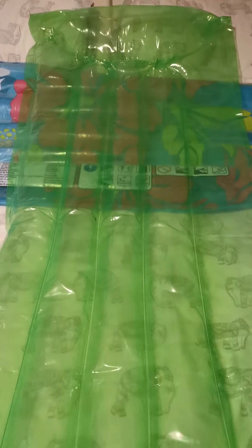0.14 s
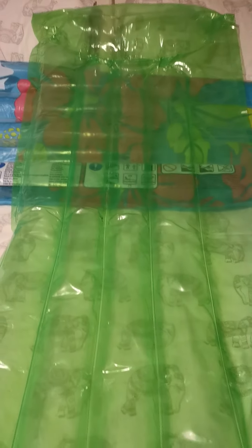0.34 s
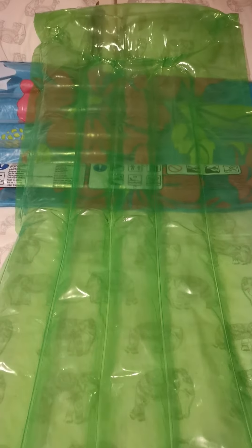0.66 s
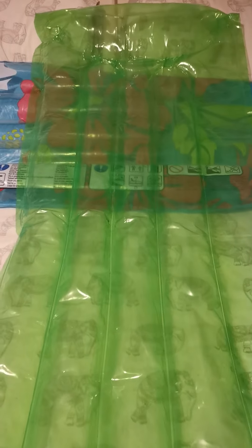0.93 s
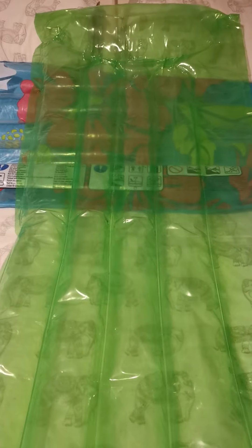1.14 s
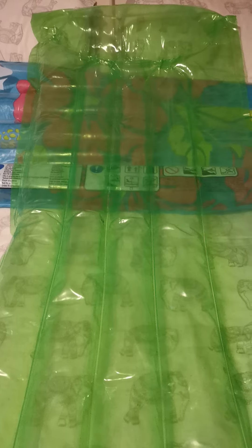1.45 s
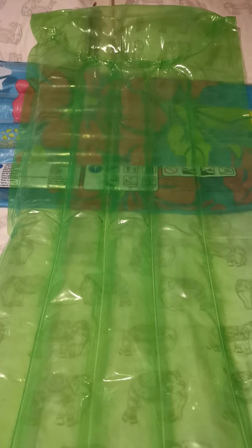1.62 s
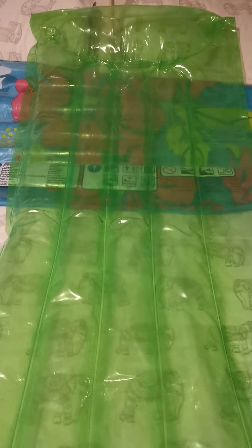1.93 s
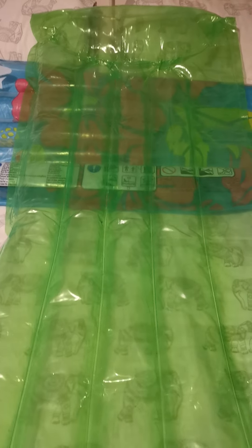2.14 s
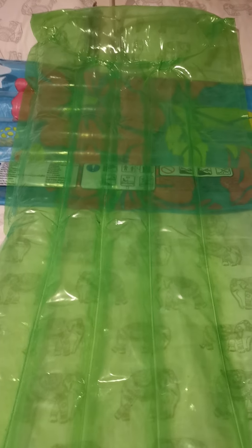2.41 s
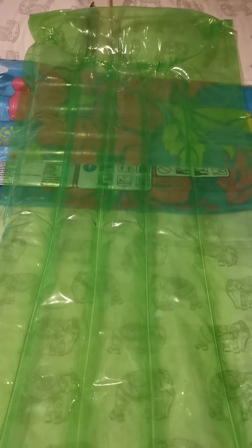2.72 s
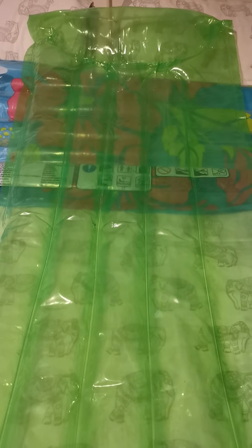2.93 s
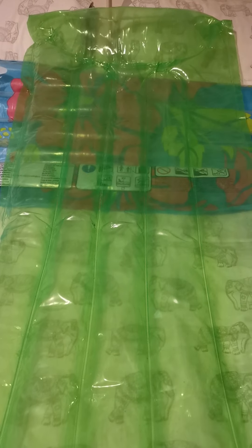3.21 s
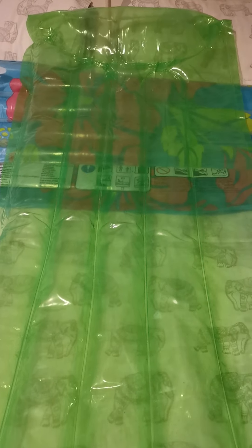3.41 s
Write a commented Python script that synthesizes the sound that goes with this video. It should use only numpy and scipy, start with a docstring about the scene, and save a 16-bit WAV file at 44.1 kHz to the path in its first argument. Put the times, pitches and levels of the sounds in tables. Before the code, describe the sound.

High, steady electric pump whine with rushing, sputtering air and faint plastic crinkling.

```python
"""A high, steady whine over rushing air: a small electric pump empties a plastic air bed, close by.
The ten-blade impeller makes the whine, the unbalanced shaft hums below it, and air flutters and
sputters through the valve. Room reflections make the blade tones swell and fade at each ear.
About two seconds in, the motor speeds up slightly and the plastic hisses and rustles for half a second."""
import sys
import numpy as np
from scipy import signal
from scipy.fft import rfft, irfft
from scipy.io import wavfile

SR = 44100
rng = np.random.default_rng(int(sys.argv[2]) if len(sys.argv) > 2 else 0)


def dump_mix(stems):
    """Bounce the given channels to the path in sys.argv[1] as a 16-bit WAV at rate SR."""
    frames = np.atleast_2d(stems).T  # one column per channel
    limited = np.clip(frames, -1, 1)  # hard clip at full scale
    pcm = np.round(limited * 32767).astype(np.int16)
    wavfile.write(sys.argv[1], SR, pcm)


N = 157437
T, HZ = np.arange(N) / SR, np.fft.rfftfreq(N, 1 / SR)
BLADES, MAINS_HZ = 10, 100


# Rides for the three blade tones, before their trims: time_s, left_db, right_db, left_lead_rad
LOW_WHINE = [(0.01, -37.2, -27.5, 0.1), (0.1, -37, -25.5, 1.5), (0.33, -42.7, -25, -4),
             (0.64, -35, -23.5, -4.5), (0.93, -36, -25.5, -5), (1.12, -35.5, -34.5, -6.5),
             (1.31, -43.4, -29.5, -7.9), (1.58, -39, -41, -8.5), (1.61, -42, -32, -3.5),
             (1.81, -32.5, -37.5, -4), (2.04, -37.5, -24, -6), (2.23, -43.9, -26, -6), (2.48, -33, -27, -5),
             (2.58, -36, -42, -4.5), (2.63, -48.5, -36, -7), (2.93, -52, -33, -9), (3.02, -59, -34, -2),
             (3.56, -44, -28, -2)]
MAIN_WHINE = [(0.01, -39.5, -27.0, -3.0), (0.06, -36.5, -29.3, -3.6), (0.14, -35.8, -24.0, -4.3),
              (0.22, -36.6, -21.3, -3.7), (0.41, -44.1, -23.9, -2.1), (0.56, -45.1, -27.1, -1.5),
              (0.73, -40.4, -23.4, -2.9), (0.93, -35.5, -23.5, -2.9), (1.1, -36.0, -30.9, -4.7),
              (1.2, -44.9, -25.5, -6.7), (1.25, -51.3, -24.7, -8.5), (1.39, -41.2, -25.6, -8.3),
              (1.54, -48.2, -24.5, -7.8), (1.68, -35.2, -29.6, -5.5), (1.9, -37.4, -27.6, -3.4),
              (2.1, -44.9, -30.8, -3.5), (2.2, -35.1, -29.8, -4.1), (2.31, -33.4, -26.9, -4.8),
              (2.41, -40.9, -31.1, -5.2), (2.48, -48.2, -39.6, -6.9), (2.55, -42.6, -29.8, -7.8),
              (2.62, -44.7, -33.5, -8.8), (2.72, -40.9, -27.1, -11.4), (2.85, -36.1, -26.9, -11.0),
              (3.2, -37.3, -24.7, -12.6), (3.45, -38.7, -25.0, -11.8), (3.53, -52.7, -26.9, -11.5)]
TOP_WHINE = [(0.01, -58, -66, 0), (0.42, -54, -49, -2), (0.77, -60, -50, 3.2), (1.081, -56.3, -53.0, -1.5),
             (1.181, -57.6, -63, -1.5), (1.47, -55, -48.5, -2.1), (2.18, -44, -56, 0.5),
             (2.37, -57, -55.9, -0.5), (2.85, -52, -49, -3.5), (3.01, -47, -54, -0.8),
             (3.29, -46, -46.5, 0.9), (3.56, -59.9, -57, 2)]

def impeller(shaft):
    """Passing blades chop the air into three harmonics, the second the strongest and purest."""
    return (blade_tone(shaft, LOW_WHINE, harmonic=1, trim_db=-1, rough=0.12, rate_hz=88)
            + blade_tone(shaft, MAIN_WHINE, harmonic=2, trim_db=5, rough=0.032, rate_hz=47)
            + blade_tone(shaft, TOP_WHINE, harmonic=3, trim_db=0.5, rough=0.3, rate_hz=14))


def blade_tone(shaft, ride, harmonic, trim_db, rough, rate_hz):
    """One harmonic of the passing blades; reflections shift its level and phase at each ear."""
    phase = harmonic * BLADES * shaft + rng.uniform(0, 2 * np.pi)
    left = amp(curve(ride)) * tone(phase + curve(ride, column=3), rough, rate_hz)
    right = amp(curve(ride, column=2)) * tone(phase, rough, rate_hz)
    return amp(trim_db) * np.array([left, right])


# Tuning of the main whine, two cycles per passing blade: time_s, pitch_hz
WHINE_PITCH = [(0, 6985), (.5, 6983), (.78, 6977), (1.1, 6976), (1.4, 6972), (1.62, 6967), (1.9, 6968),
               (2.05, 6984), (2.32, 6994), (2.62, 6990), (2.9, 6982), (3.2, 6975), (3.57, 6977)]

def shaft_angle(ripple_hz=0.36, jitter_hz=0.067):
    """The shaft's turning in radians; its speed drifts, jitters and ripples with the mains."""
    ripple = ripple_hz * np.sin(2 * np.pi * MAINS_HZ * T)
    speed_hz = curve(WHINE_PITCH) / (2 * BLADES) + ripple + jitter_hz * wander(30)
    return 2 * np.pi * np.cumsum(speed_hz) / SR


# Colour of the rushing air: freq_hz, left_db_per_hz, right_db_per_hz
AIR_COLOUR = [(30, -100, -95), (65, -90, -98), (100, -83, -82.5), (131, -83.5, -86), (180, -81.5, -77.5),
              (214, -81, -82.5), (330, -72.5, -78.5), (405, -74.5, -87), (424, -72.5, -69), (570, -79, -77),
              (617, -72.5, -73), (620, -81, -82.5), (820, -79.5, -76), (890, -73.5, -71),
              (1320, -75.5, -75.5), (1580, -76, -76.5), (1990, -73.5, -71), (2590, -74.5, -62),
              (2900, -91, -68.5), (3410, -69, -61), (4080, -77.5, -63.5), (5030, -64.5, -63),
              (5460, -68, -63), (5620, -69.5, -62.5), (6560, -68, -67), (7150, -76, -60.5),
              (7780, -65, -63.5), (8110, -71, -76), (9260, -78.5, -82), (9740, -86.5, -92),
              (15000, -91, -93.5)]
# Swell of the air, of which each band takes a small share: time_s, contour_db
AIR_SWELL = [(0.0, -37), (0.24, -60), (0.55, -41), (0.76, -40), (1.01, -41), (1.62, -35), (2.1, -34.5),
             (3.25, -36.5), (3.57, -39)]

def airflow(trim_db=-1.48, waver_db=1.17, flicker_db=0.68):
    """Air rushes through the pump, each band wavering on its own over a shared flicker."""
    air_spectrum = rfft(rush(AIR_COLOUR)) * reflections()
    contour = curve(AIR_SWELL)
    flicker = flicker_db * wander(78)
    centres_hz = [0, 900, 2300, 3600, 4800, 6200, 8000, 12000]
    air = 0
    for hz, weights in zip(centres_hz, np.eye(len(centres_hz))):
        band = irfft(air_spectrum * np.interp(HZ, centres_hz, weights), N)
        share = np.interp(hz, [2050, 4060, 6400, 8850], [0.076, 0.064, 0.2, 0.0])
        swell = share * (contour - contour.mean())
        air = air + band * amp(trim_db + swell + flicker + waver_db * wander(13.6))
    return air


def reflections(spread_db=1.1, spacing_hz=70, above_hz=1800):
    """Reflections in the housing and the room leave fine steady peaks and dips in the air's colour."""
    grid_hz = np.arange(0, SR / 2, spacing_hz)
    peaks_db = spread_db * rng.standard_normal((2, len(grid_hz))) * (grid_hz > above_hz)
    return amp([np.interp(HZ, grid_hz, ear) for ear in peaks_db])


# Fader ride of the shaft hum: time_s, level_db
HUM_LEVEL = [(0.01, -31), (0.09, -29), (0.27, -30.5), (0.59, -29), (0.85, -30), (1.13, -28.5),
             (1.28, -29.5), (1.81, -29), (2.35, -30), (2.51, -27.7), (3.27, -29.5), (3.56, -29)]
# Partials of the hum: harmonic, relative_db, roughness
HUM_PARTIALS = [(1, -3.5, .05), (2, -34, 0.74), (3, -17.5, 0), (4, -32.5, 0), (5, -15.5, 0.07),
                (7, -34.5, 0.7), (9, -28, 0.78), (11, -42, 0.4)]

def motor(shaft, mains_db=-71):
    """The unbalanced shaft shakes the housing, mostly at odd harmonics, over a faint mains hum."""
    hum = sum(amp(db) * tone(harmonic * shaft + rng.uniform(0, 2 * np.pi), rough, rate_hz=19.6)
              for harmonic, db, rough in HUM_PARTIALS)
    mains = amp(mains_db) * np.sqrt(2) * np.sin(2 * np.pi * MAINS_HZ * T)
    return hum * amp(curve(HUM_LEVEL)) * pan(-0.4, 0.4) + mains


# Two breathy resonances of the air path: time_s, pitch_hz, right_level_db
LOW_RING = [(0, 3720, -30), (.3, 3717, -34.5), (.65, 3775, -34.5), (1.1, 3856, -36), (1.7, 4155, -32),
            (2, 4200, -44), (2.6, 3464, -50), (3, 3405, -42), (3.3, 3446, -34), (3.57, 3424, -37)]
HIGH_RING = [(0, 4450, -37), (.35, 4385, -35), (.65, 4370, -32), (1.1, 4550, -36.5), (1.7, 4765, -30.5),
             (2.1, 4886, -38.5), (2.6, 4790, -34.5), (3.57, 4680, -34.5)]

def air_ring(track, width_hz, left_db):
    """Noise rings in a resonance that drifts in pitch as the bed empties."""
    phase = 2 * np.pi * np.cumsum(curve(track)) / SR
    ears = np.array([wander(width_hz / 2) * np.cos(phase) + wander(width_hz / 2) * np.sin(phase)
                     for _ in range(2)])
    return ears * amp(curve(track, column=2)) * pan(left_db, 0)


# Sputter cues: centre_s, length_s, level_db
SPUTTERS = [(0.12, 0.015, -28.5), (0.286, 0.023, -32.5), (0.527, 0.0091, -37), (0.537, .014, -28.5),
            (.56, 0.0098, -34), (.683, 0.012, -33), (0.725, 0.0096, -32), (0.822, 0.007, -30),
            (.865, 0.019, -26), (1.082, 0.031, -32), (1.128, 0.016, -31), (1.26, .008, -29),
            (1.281, .014, -27.5), (1.385, 0.0052, -23), (1.398, 0.0031, -27), (1.468, .009, -29.5),
            (1.879, 0.0072, -28.5), (2.311, 0.026, -31), (2.351, 0.053, -26.5), (2.469, 0.0056, -23),
            (2.69, 0.017, -28), (2.745, .014, -30.5), (2.786, 0.0089, -27), (2.802, .007, -29),
            (2.871, .007, -34), (2.885, 0.01, -29), (2.923, .007, -37), (3.092, 0.0059, -42),
            (3.326, 0.01, -35), (3.355, 0.0063, -27), (3.38, .012, -32), (3.406, 0.0068, -29)]
# EQ of the valve: freq_hz, gain_db
VALVE_EQ = [(300, -27.5), (900, -15.5), (1450, -14.5), (1950, -2.5), (2500, 1.5), (3000, -9), (3600, -6.5),
            (5000, -16), (9000, -36.5)]

def valve(flutter_db=-38.5, surge_db=4.5):
    """Air flutters past the soft valve and breaks into sputters, each a run of tiny uneven pops."""
    surge = surge_db * amp(curve(HISS_LEVEL))  # harder while the plastic hisses
    flutter = amp(flutter_db + surge) * unit(uneven_gain(spread_db=2.5, rate_hz=73.4))
    sputter_power = sum(amp(db) ** 2 * np.exp(-(2 * (T - centre_s) / length_s) ** 2)
                        for centre_s, length_s, db in SPUTTERS)
    pops = irfft(noise_pair(), N) * uneven_gain(spread_db=5, rate_hz=595)
    pops = unit(irfft(rfft(pops) * amp(spectrum(VALVE_EQ)), N))
    return pops * np.sqrt(flutter ** 2 + sputter_power) * pan(-2.5, 2)


# Fader ride of the plastic's hiss: time_s, gain_db
HISS_LEVEL = [(1.86, -40), (1.9, -6), (1.93, -1), (2.1, -2), (2.26, -2), (2.3, -3.5), (2.37, -8.5),
              (2.42, -16), (2.5, -40)]
# Colour of the hiss: freq_hz, left_db_per_hz, right_db_per_hz
HISS_COLOUR = [(200, -92, -97), (600, -78, -79), (1285, -70, -71.5), (2210, -66, -63.5), (3163, -88, -80),
               (5000, -75, -80), (8000, -75, -78), (9400, -69.5, -73.5), (11800, -79, -77.5),
               (12930, -75, -94), (15000, -78, -91)]

def plastic_hiss(top_fade_db_per_s=14, flicker_db=0.86):
    """The plastic hisses as air is drawn past it, its top end growing duller."""
    since_onset_s = np.maximum(T - HISS_LEVEL[1][0], 0)
    hiss = rush(HISS_COLOUR)
    top = irfft(rfft(hiss) * np.clip((HZ - 11500) / 1500, 0, 1), N)
    hiss = hiss - top + top * amp(-top_fade_db_per_s * since_onset_s)
    return hiss * amp(curve(HISS_LEVEL) + flicker_db * wander(60))


# Fader ride of the crinkles: time_s, level_db
CRINKLE_LEVEL = [(0, -53), (1.3, -56), (1.8, -39), (2.5, -35), (3.2, -40), (3.57, -57)]
# EQ of the crinkles: freq_hz, gain_db
CRINKLE_EQ = [(1000, -27), (4000, 6), (8000, -1), (11000, -22), (15000, -9)]

def plastic_crinkle(snaps_per_s=1800, spread_db=5):
    """The plastic crinkles faintly throughout in a dense spray of tiny snaps."""
    hits = rng.random((2, N)) < snaps_per_s / SR
    snaps = hits * amp(spread_db * np.minimum(rng.exponential(1, (2, N)), 3))
    crinkles = unit(irfft(rfft(snaps) * amp(spectrum(CRINKLE_EQ)) * (HZ > 200), N))
    return crinkles * amp(curve(CRINKLE_LEVEL)) * pan(0, -3)


# Stereo image of the air, valve and hiss: freq_hz, coherence, left_lead_rad
NOISE_IMAGE = [(50, .85, 0), (300, .96, 0), (1300, .93, 0), (2500, .75, 0), (3300, .35, .8),
               (4400, .4, 2.8), (7500, .45, 3.3), (14000, .2, 6)]

def noise_pair():
    """Spectra of white noise at two ears, alike in the bass and drifting apart in the treble."""
    left, independent = rfft(rng.standard_normal((2, N)))
    coherence = spectrum(NOISE_IMAGE)
    right = coherence * left + np.sqrt(1 - coherence ** 2) * independent
    return np.array([left, right * np.exp(-1j * spectrum(NOISE_IMAGE, column=2))])


def rush(colour):
    """Noise with a given density at each ear."""
    density = amp([spectrum(colour), spectrum(colour, column=2)])
    return irfft(noise_pair() * density, N) * np.sqrt(SR / 2)


def tone(phase, rough, rate_hz):
    """A partial that turbulence shakes in level and phase."""
    carrier = (1 + rough * wander(rate_hz)) * np.cos(phase)
    return np.sqrt(2) * (carrier + rough * wander(rate_hz) * np.sin(phase))


def uneven_gain(spread_db, rate_hz):
    """A randomly moving gain with its peaks capped."""
    return amp(spread_db * np.minimum(wander(rate_hz), 2))


def wander(rate_hz):
    """Smooth random motion at unit RMS, mostly slower than rate_hz."""
    return unit(irfft(rfft(rng.standard_normal(N)) / (1 + (HZ / rate_hz) ** 4) * (HZ > 0), N))


def curve(rows, column=1):
    """One column of a table over time."""
    rows = np.array(rows)
    return np.interp(T, rows[:, 0], rows[:, column])


def spectrum(rows, column=1):
    """One column of a table over log frequency."""
    rows = np.array(rows)
    return np.interp(np.log(HZ + 1), np.log(rows[:, 0]), rows[:, column])


def pan(left_db, right_db):
    return amp([[left_db], [right_db]])


def amp(db):
    return 10 ** (np.asarray(db) / 20)


def unit(x):
    return x / np.sqrt(np.mean(x ** 2) + 1e-20)


def scene():
    """The mix: hum and whine locked to one shaft, with air, valve and plastic around them."""
    shaft = shaft_angle()
    rings = air_ring(LOW_RING, width_hz=410, left_db=-6)
    rings += air_ring(HIGH_RING, width_hz=530, left_db=-18.5)
    pump = motor(shaft) + impeller(shaft) + airflow() + rings
    return pump + valve() + plastic_hiss() + plastic_crinkle()


def record(dry, cutoff_hz=15250):
    """A steep high cut on the whole mix."""
    lowpass = signal.firwin(511, cutoff_hz, window=("kaiser", 9), fs=SR)
    return signal.oaconvolve(dry, lowpass[None], "same")


dry = scene()
out = record(dry)
dump_mix(out)
```